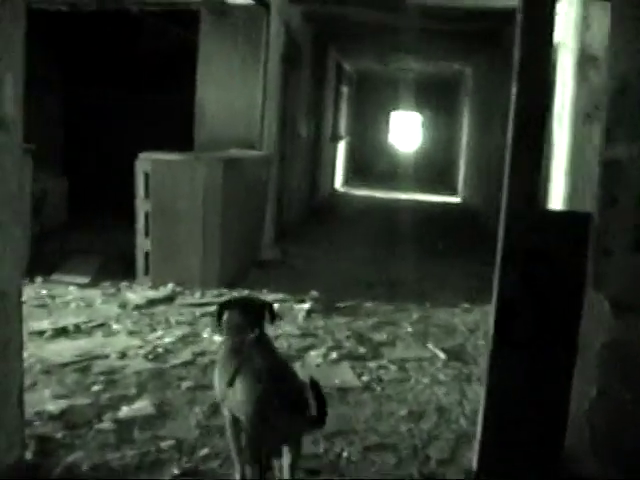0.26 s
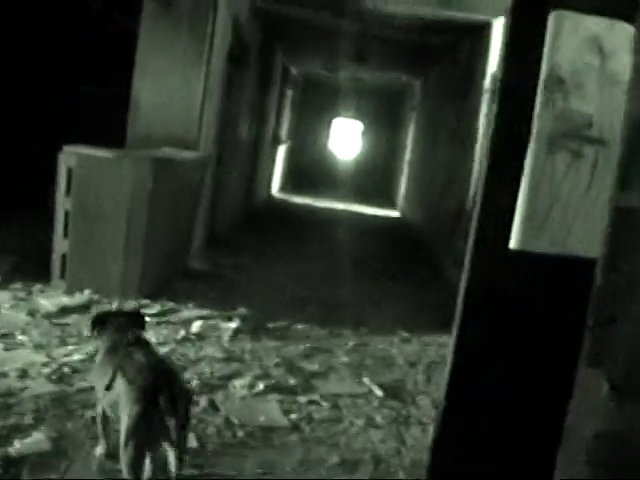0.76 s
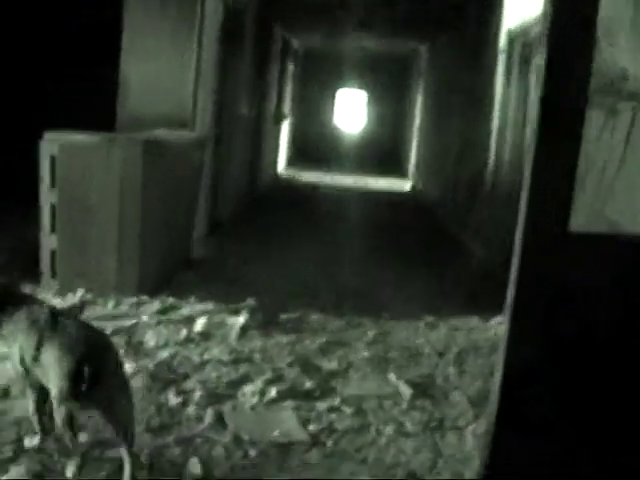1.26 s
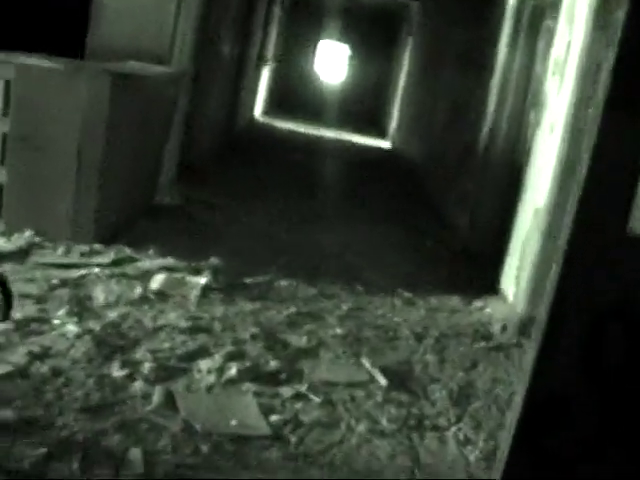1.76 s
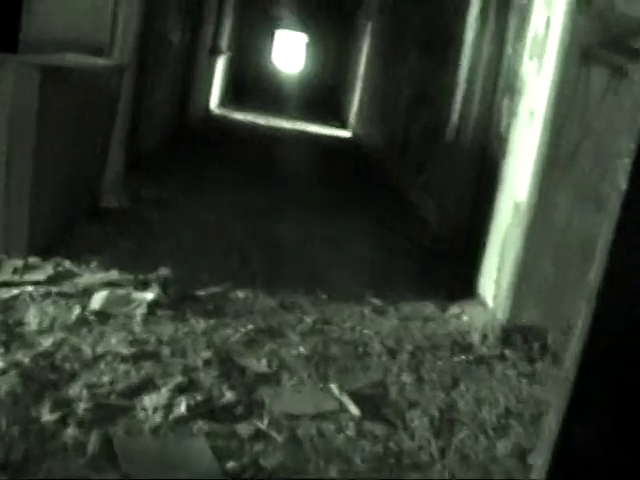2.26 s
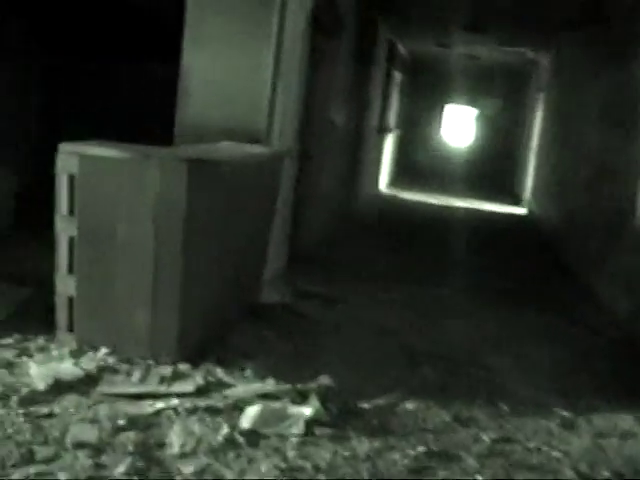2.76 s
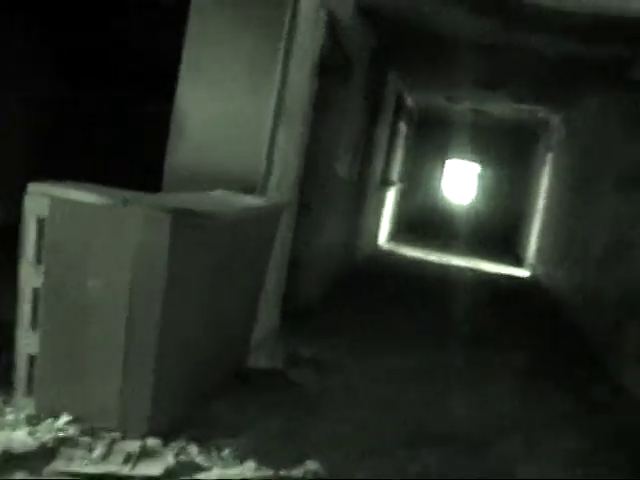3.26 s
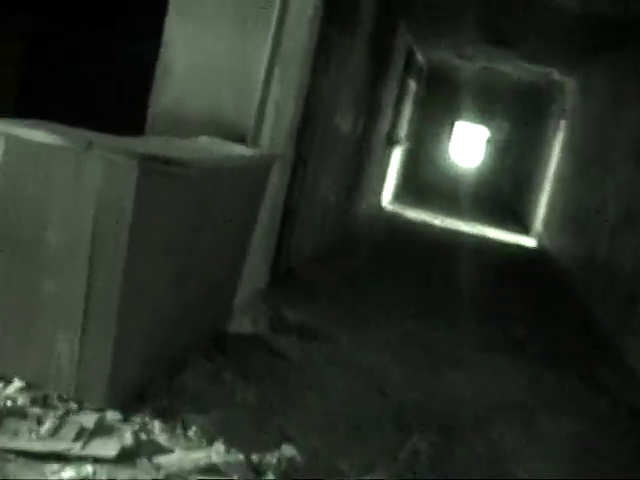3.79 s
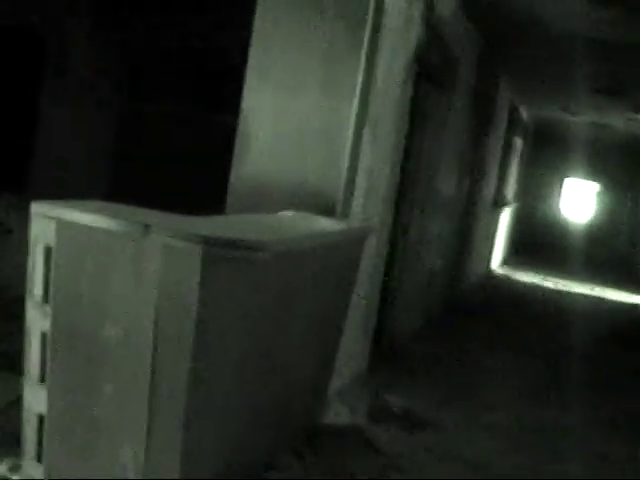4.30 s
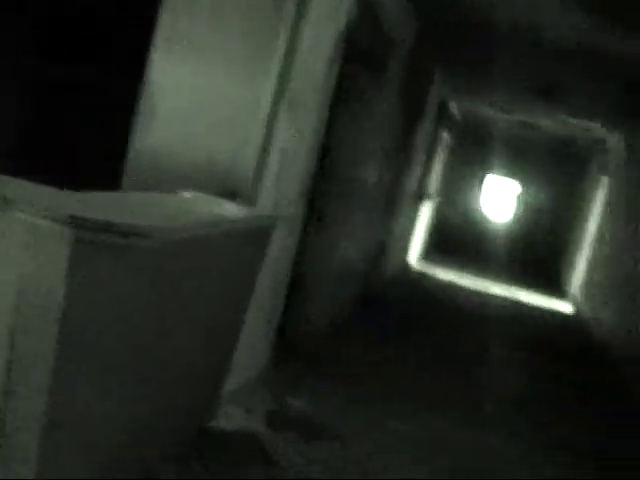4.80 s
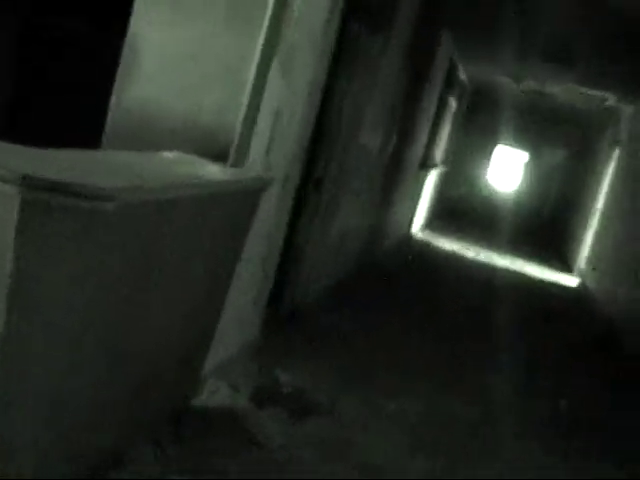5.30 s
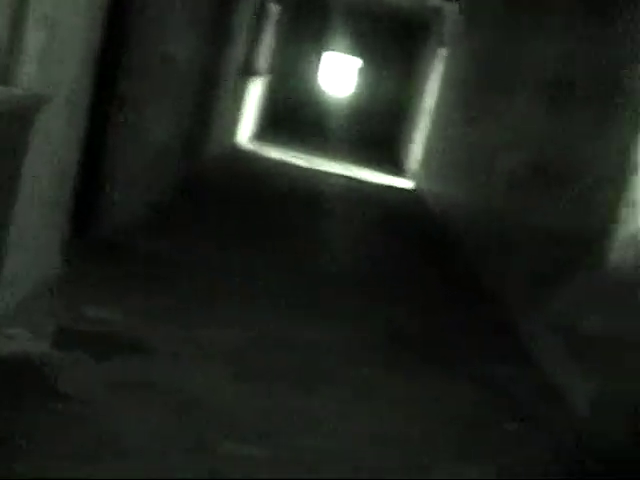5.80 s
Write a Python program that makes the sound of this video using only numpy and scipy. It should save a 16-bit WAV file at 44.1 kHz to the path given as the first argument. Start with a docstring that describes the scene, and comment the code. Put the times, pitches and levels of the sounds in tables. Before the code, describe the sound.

Someone walks over loose debris in a bare derelict corridor: grit crackles, slabs knock hollowly, small metal tinkles, something creaks under weight.

```python
"""Debris cracks, footfalls thud, grit crumbles, slabs knock; small metal pieces, perhaps a dog's collar tags, clink.
A creak comes late, over hiss. Someone walks over broken plaster and rubble in a derelict corridor, camera in hand.
Debris is sparse clicks, smeared and filtered by each piece; metal adds damped partials; the creak is stick-slip.
Side walls return a short flutter, nearby surfaces a scatter of echoes and the bare rooms a tail.
Heel thumps are damped pushes, handling is low filtered noise; the camera adds soft limiting and a thin whine."""
import sys
import numpy as np
from scipy import signal
from scipy.fft import rfft, irfft
from scipy.io import wavfile
from scipy.ndimage import map_coordinates

SR = 44100
rng = np.random.default_rng(int(sys.argv[2]) if len(sys.argv) > 2 else 0)


def wrap_up_sound(samples):
    """Save the sound to the file named by the first command line argument, as 16-bit audio."""
    columns = np.atleast_2d(samples).T
    # keep every value between -1 and 1, then stretch to whole-number steps
    tamed = np.clip(columns, -1, 1)
    steps = np.round(tamed * 32767).astype(np.int16)
    wavfile.write(sys.argv[1], SR, steps)


N = 266805

# Background hiss spectrum. Each row: frequency in Hz, relative density in dB per Hz.
HISS_SPECTRUM = [(24, -35), (40, 1), (156, 0.5), (186, -2.5), (270, -2), (746, -8.5), (1780, -6.5),
                 (2110, -13), (2710, -13), (15000, -21.5)]
HISS_RMS_DB, HISS_SWELL_DB, HISS_SWELL_S = -60.5, 1.1, .12  # mean level, swell scatter, knot spacing

# Handling rumble spectrum. Each row: frequency in Hz, relative density in dB per Hz.
HANDLING_SPECTRUM = [(15, -17), (70, 0.0), (130, 3.0), (250, -21.0), (1000, -39), (8000, -104)]
# The hand bumps the camera. Each row: centre in seconds, peak rms in dB, half length to 1/e in seconds.
HAND_BUMPS = [(3.262, -50, 0.018), (5.77, -49, 0.11), (5.968, -47, 0.072)]
GRIP_RMS_DB = -77  # steady hand

# Loose grains: always, added just after a crunch, added under the weight that makes the creak.
GRIT_RMS_DB, STIRRED_RMS_DB, LOADED_RMS_DB = -68.5, -60, -57.5
SETTLE_S, LOADED_UNTIL_S = 0.048, 5.45

# A piece of debris cracks or a footfall thuds, with one broad resonance.
# Each row: start in seconds, energy in dB before trim, centre in Hz, width in octaves.
CRACKS_AND_THUDS = [(0.0112, -21.5, 4620, 3), (0.028, -19.0, 1330, 0.42), (0.115, -19.5, 12000, 0.91),
                    (0.166, -22, 3420, 0.2), (0.273, -23.5, 3240, 0.23), (0.342, -12, 1680, 1.2),
                    (0.3548, -11, 860, 0.97), (0.4423, -12.5, 12000, 2.3), (0.5491, -18, 1250, 2),
                    (0.613, -22, 12000, 4.1), (0.701, -22.5, 2400, 0.86), (1.0223, -16, 2010, 0.98),
                    (1.031, -17.5, 467, 1.5), (1.0821, -15.5, 1400, 1.1), (1.138, -19.5, 1960, 1.7),
                    (1.1628, -14, 8560, 0.66), (1.22, -5, 2830, 1.04), (1.2688, -14, 12000, 0.99),
                    (1.3068, -20.0, 2600, 0.61), (1.4615, -11, 2140, 0.69), (1.5312, -13.5, 2160, 0.68),
                    (1.713, -18, 209, 0.95), (1.7612, -10.5, 970, 0.93), (1.8876, -20.5, 1180, 0.4),
                    (2.087, -28.5, 4840, 1.7), (2.37, -18.5, 2250, 1.6), (2.389, -13.5, 870, 0.69),
                    (2.567, -18.5, 1620, 0.77), (2.6016, -22, 2300, 2.8), (2.6785, -25, 1310, 1.04),
                    (2.775, -26, 2100, 0.37), (2.883, -22, 3620, 1.1), (2.9619, -23, 2500, 0.66),
                    (3.1, -13.5, 1500, 0.27), (3.139, -8, 1300, 1.4), (3.1546, -14, 3900, 0.42),
                    (3.181, -13.5, 1400, 0.26), (3.216, -12.5, 3510, 0.82), (3.633, -23, 7950, 1.9),
                    (3.7768, -4, 890, 0.43), (3.7864, -4, 4630, 0.83), (3.846, -8, 1770, 2.2),
                    (3.8851, -3.5, 610, 1.54), (3.889, -9, 4000, 1.2), (3.9974, -12, 1610, 1.1),
                    (4.184, -26, 1620, 1.1), (4.5, -20.5, 1550, 0.8), (4.5615, -10.0, 1120, 0.4),
                    (4.6185, -10, 2420, 1.35), (5.3752, -22, 670, 0.49), (5.7174, -15.5, 674, 0.91),
                    (5.8287, -12.5, 520, 1.46)]
# Rubble radiates little deep bass or top treble. Each row: frequency in Hz, gain in dB.
RUBBLE_REACH = [(20, -67), (100, -6.5), (220, -1.5), (7300, -3), (10500, -11), (16000, -23)]
# The walker leaves the open room for the narrow corridor.
# Each row: time in seconds, impact send to the tail in dB before each impact type's offset.
TAIL_SEND = [(0, -10), (3.7, -8), (4.2, -9), (6, -11)]
LEAD_S = .008  # grinding before the click

# Grit crumbles under a foot. Each row: start in seconds, energy in dB, middle ring in Hz, snap in dB,
# length in seconds.
GRIT_CRUNCHES = [(0.083, -22, 2820, 16, 0.028), (0.148, -20, 3380, -11.5, 0.042),
                 (0.256, -15.5, 2150, 7.5, 0.094), (0.358, -9, 2920, 14.5, 0.017),
                 (0.376, -21.5, 1010, -7, 0.089), (0.456, -8, 3600, -13.5, 0.0082),
                 (0.7, -22, 2140, -1, 0.034), (0.863, -8.5, 3940, -9.5, 0.013), (1.024, -19, 540, 8, 0.06),
                 (1.046, -16, 2480, 5, 0.077), (1.114, -17, 2680, -34, 0.09), (1.27, -17, 4170, 19, 0.072),
                 (1.373, -19, 1290, -0.5, 0.053), (1.466, -9.5, 2140, 2, 0.031),
                 (1.696, -18, 855, 7, 0.034), (2.241, -26.5, 4870, -4, 0.023),
                 (3.087, -17, 1540, 1.5, 0.023), (3.122, -14, 1280, 1, 0.029),
                 (3.172, -11.5, 1200, 5, 0.033), (3.264, -6, 1080, 3, 0.057), (3.792, -7, 3330, 9, 0.047),
                 (3.916, -14, 1520, 14, 0.049), (4.005, -22, 6340, 13, 0.057),
                 (4.535, -16.5, 545, 5, 0.017), (4.647, -17, 3730, -15, 0.047), (5.407, -18, 2250, -1, 0.1),
                 (5.618, -24.5, 1920, 12, 0.02), (5.712, -13, 640, -7, 0.066)]
MID_PIECE_HZ, THUD_DB, THUD_DB_PER_OCTAVE = 1340, 7.5, 7  # bigger chips ring lower and thud more
FIZZ_DB, FIZZ_DB_PER_SNAP_DB = -10, 1.8

# Small metal pieces, perhaps a dog's collar tags, touch. Each row: start in seconds, energy in dB,
# main partial in Hz, second partial in Hz, t60 in seconds, chatter decay in seconds.
METAL_CLINKS = [(0.2097, -10.5, 8150, 7160, .04, 0.00039), (0.527, -10, 10400, 5830, 0.039, 0.0031),
                (1.4235, -10, 10100, 11200, 0.055, 0.0014), (2.205, -25.5, 4930, 7460, .06, 0.0071),
                (2.251, -25.5, 6200, 4400, .12, 0.0063), (2.271, -19.5, 4470, 5900, 0.047, 0.0044),
                (2.301, -21, 7860, 5040, 0.067, 0.0015), (3.407, -20, 8320, 6900, .08, 0.0074),
                (3.928, -15, 6890, 8100, 0.13, 0.008), (4.011, -13.5, 6950, 8140, 0.13, 0.017),
                (4.087, -19.5, 7040, 10330, .25, 0.029), (4.218, -23, 8050, 7170, .2, 0.017),
                (4.564, -16, 5400, 8640, 0.15, 0.0077), (5.593, -20, 8570, 5400, 0.087, 0.0079)]
# Weaker modes of the metal, before scatter. Each entry: frequency in Hz.
METAL_MODES_HZ = [4350, 4860, 5400, 6300, 6920, 8200, 8900, 10900, 11020, 12700, 14030]
CLINK_REACH_LN, CLINK_DETUNE_SHARE = .7, .012  # width of the struck group (log frequency), pitch scatter

# A slab tips and knocks. Each row: start in seconds, energy in dB before trim, body in Hz, body in dB,
# main ring in Hz, upper ring in Hz, upper ring in dB, snap in dB; the parts are relative to the main ring.
SLAB_KNOCKS = [(0.872, -6.5, 1110, 1.5, 1830, 4450, -1, -16), (1.2155, -7, 730, -12, 1300, 3410, -9, -23.5),
               (3.2583, 7.5, 413, -8.5, 1160, 1980, -10.5, -16.5),
               (3.348, -4.5, 514, 0.5, 1510, 2200, -0.5, -16.5),
               (3.768, 4.5, 1000, -0.5, 1550, 1920, -1.5, -3.5),
               (3.8799, 5.5, 374, -3, 780, 1880, -3.5, -8.5), (3.9565, -0.5, 480, -1.5, 1820, 2570, 6.5, 3),
               (4.2467, 4, 370, -6, 1290, 2600, -9, -17.5), (4.306, -1, 477, -7, 1590, 1960, -3.5, -26.5),
               (5.4162, -7, 720, -22, 716, 1290, -6, -24), (5.739, -9.5, 300, -7, 587, 1700, -21, -47),
               (5.769, 2, 463, -6.5, 820, 1040, 1, -25)]

# A heel lands and the floor thumps. Each row: start in seconds, envelope peak in dB.
HEEL_THUMPS = [(3.259, -25.5), (3.881, -37.5)]
THUMP_S = .0014  # time constant of the push

# Creak speed. Each row: time in seconds, slips per second.
CREAK_SLIP_RATE = [(4.7245, 27), (4.8, 49), (5., 87), (5.08, 97), (5.21, 40), (5.345, 28)]
# Body the slips shake, before scatter. Each row: frequency in Hz, relative density in dB per Hz.
CREAK_BODY_SPECTRUM = [(90, -26), (200, -21), (300, -0.5), (440, -2.5), (630, -7), (800, 6), (1100, 4),
                       (1700, 7), (2550, 1), (3700, 7.5), (4600, 2), (5400, -5.5), (8500, -7.5),
                       (11500, -16), (15000, -43)]
# Weight on the creak. Each row: time in seconds, added slip force in dB.
CREAK_WEIGHT = [(4.75, 0), (4.8, 0), (4.92, 1.5), (4.96, -1), (4.985, -1), (4.997, 1), (5.028, -2),
                (5.045, -3), (5.062, -0.5), (5.1, 2.5), (5.12, -3.5)]
SLIP_DB, SLIP_AT_PER_S, SLIP_DB_PER_OCTAVE = -9, 82, 5  # faster slips hit harder
EASE_S, EASE_DB = 5.118, -3.5  # the weight comes off and the slips turn soft
SLIP_WANDER_DB, SLIP_JITTER_S = 1.3, .0003  # each slip catches at another spot

WALLS_S = .00756  # round trip between the side walls
# Tail of the rooms. Each row: frequency in Hz, t60 in seconds.
ROOM_T60 = [(150, 0.96), (500, 0.34), (1200, 0.41), (3000, 0.37), (7000, 0.38), (14000, 0.38)]

# Left-right likeness of diffuse sound. Each row: frequency in Hz, correlation.
PORT_LIKENESS = [(40, 0.54), (150, 1), (400, 0.75), (1200, 0.77), (3000, 0.63), (6000, 0.37), (14000, 0.94)]
# Phase between the ports. Each row: frequency in Hz, left lead in radians.
PORT_LEAD = [(10, 0.52), (3000, 0.42), (6000, 0.88), (7500, 0.98), (9500, 2.07), (11000, 2.05),
             (12500, 1.4), (15000, 2.8)]
EDGE_HZ = 16250  # upper band limit


def amp(db):
    """Decibels to gain."""
    return 10 ** (np.asarray(db) / 20)


def unit(x):
    """Scales to energy 1."""
    return x / np.sqrt(np.sum(x ** 2) + 1e-20)


def read(points, hz):
    """Reads a table of (Hz, value) on a log-frequency axis."""
    f, value = np.transpose(points)
    return np.interp(np.log(hz + 1), np.log(f + 1), value)


def add(mix, start_s, sound):
    """Mixes a sound in from start_s."""
    part = mix[max(0, round(start_s * SR)):][:len(sound)]
    part += sound[:len(part)]


def colour(x, shape, size=2048):
    """Causal minimum-phase filter whose gain in dB is shape(Hz)."""
    log_gain = np.log(amp(shape(abs(np.fft.fftfreq(size, 1 / SR)))))
    taps = np.fft.ifft(np.exp(np.conj(signal.hilbert(log_gain)))).real
    return signal.oaconvolve(x, taps[:size // 2])


def hump(f, hz, octaves):
    """Power of one broad resonance."""
    return (1 + (np.log2((f + 1) / hz) / octaves) ** 2) ** -2.


def diffuse(a, b):
    """Two unrelated signals become the partly alike pair that two close ports hear."""
    same = np.clip(read(PORT_LIKENESS, np.fft.rfftfreq(N, 1 / SR)), 0, 1)
    mid = rfft(a[:N]) * np.sqrt((1 + same) / 2)
    side = rfft(b[:N]) * np.sqrt((1 - same) / 2)
    return irfft([mid + side, mid - side], N)


def noise(spectrum):
    """Diffuse filtered noise of about rms 1."""
    white = rng.standard_normal((2, N))
    coloured = [unit(colour(w, lambda f: read(spectrum, f))) for w in white]
    return diffuse(*coloured) * np.sqrt(N)


def grains(count, per_s, spread_db):
    """Sparse clicks of either sign, a few much larger than the rest."""
    size = amp(spread_db * np.minimum(rng.exponential(1, count), 3.5))
    return size * rng.choice([-1, 1], count) * (rng.random(count) < per_s / SR)


def smear(x, longest_s=.0009, count=3):
    """A click rattles through a solid piece: all-pass loops spread it and keep its spectrum."""
    for delay in (SR * longest_s * rng.uniform(.15, 1, count)).astype(int):
        loop = np.r_[1, np.zeros(delay), .55 * rng.choice([-1, 1])]
        x = signal.lfilter(loop[::-1], loop, x)
    return x


def shard(drive, hz, thud_db, snap_db, fizz_db, ring_db):
    """Rubble answers a force with a broad spectrum and one quickly damped ring."""
    body = [(20, thud_db - 28), (90, thud_db - 14), (190, thud_db - 6), (400, thud_db * .4),
            (800, 0), (1500, -1), (2600, snap_db / 2 - 1), (4800, snap_db),
            (7300, (snap_db + fizz_db) / 2 + 3), (10500, fizz_db), (16000, fizz_db - 12)]

    def gain_db(f):
        return read(body, f) + ring_db / (1 + (np.log((f + 1) / hz) / 0.28) ** 2)

    return unit(colour(drive, gain_db))


def hiss():
    """Diffuse background noise whose level rises and sinks a little."""
    knots_s = np.arange(0, N / SR + HISS_SWELL_S, HISS_SWELL_S)
    swell_db = HISS_SWELL_DB * np.interp(np.arange(N) / SR, knots_s, rng.standard_normal(len(knots_s)))
    return amp(HISS_RMS_DB + swell_db) * noise(HISS_SPECTRUM)


def grip():
    """Strength of the handling rumble: a steady hand and a few soft bumps."""
    t = np.arange(N) / SR
    bumps = sum(amp(db) * np.exp(-((t - s) / half_s) ** 2) for s, db, half_s in HAND_BUMPS)
    return amp(GRIP_RMS_DB) + bumps


def handling():
    """The shaking body pushes the two capsules in opposite senses."""
    return grip() * noise(HANDLING_SPECTRUM) * np.array([[1], [-1]])


def grit(near, far, room_db=-2, ring_db=20):
    """Loose grains tick, each size at its own pitch; crunches stir them, and they grind under the weight."""
    ticks = sum(shard(smear(grains(N, 45, 4)), hz, -4, -5, -14, ring_db)[:N]
                for hz in np.geomspace(500, 6000, num=9))
    t = np.arange(N) / SR
    stirred = np.max([(t > s) * np.exp(-abs(t - s) / SETTLE_S) for s, *_ in GRIT_CRUNCHES], axis=0)
    loaded = (t > CREAK_SLIP_RATE[0][0]) & (t < LOADED_UNTIL_S)
    level = amp(GRIT_RMS_DB) + amp(STIRRED_RMS_DB) * stirred + amp(LOADED_RMS_DB) * loaded
    sound = unit(ticks) * np.sqrt(N) * level
    add(near, 0, sound)
    add(far, 0, amp(room_db) * sound)


def impact(near, far, s, db, power, lead_db, crumbs_db, crumbs_s, room_db):
    """A brief grind, then one click and a spray of crumbs, all coloured by the body that is hit."""
    t = np.arange(SR // 16) / SR
    rise = np.linspace(0, 1, round(LEAD_S * SR))
    lead = amp(lead_db) * unit(rng.standard_normal(len(rise)) * rise ** 2)
    drive = amp(crumbs_db) * unit(grains(len(t), 4000, 5.5) * np.exp(-t / crumbs_s))
    drive[0] += 1  # the click

    def gain_db(f):
        return read(RUBBLE_REACH, f) + 10 * np.log10(power(f) + 1e-7)

    sound = amp(db) * unit(colour(smear(np.r_[lead, drive]), gain_db))
    send_db = room_db + np.interp(s, *np.transpose(TAIL_SEND))
    add(near, s - LEAD_S, sound)
    add(far, s - LEAD_S, amp(send_db) * sound)


def cracks_and_thuds(near, far, trim_db=-1):
    """A piece of debris cracks or a footfall thuds, each with one broad resonance."""
    for s, db, hz, octaves in CRACKS_AND_THUDS:
        impact(near, far, s, db + trim_db, lambda f: hump(f, hz, octaves),
               lead_db=-10.5, crumbs_db=-8, crumbs_s=.006, room_db=3)


def fizz_of(snap_db):
    """The sharper a piece breaks, the more top treble it gives, in dB over its mids."""
    return FIZZ_DB + FIZZ_DB_PER_SNAP_DB * snap_db


def crunches(near, far, room_db=-6, count=7):
    """Chips of several sizes fracture, each at its own pitch; the cloud swells and dies with the pressure."""
    t = np.arange(SR // 5) / SR
    for s, db, hz, snap_db, length_s in GRIT_CRUNCHES:
        pressure = (t / length_s) ** 0.55 * np.exp(-3.6 * (t / length_s) ** 7.8)
        thud_db = THUD_DB - THUD_DB_PER_OCTAVE * np.log2(hz / MID_PIECE_HZ)
        chips = []
        for pitch_hz in hz * np.geomspace(.55, 1.9, num=count):
            drive = smear(grains(len(t), 240, 5.3) * pressure)
            chips.append(shard(drive, pitch_hz, thud_db, snap_db, fizz_of(snap_db), ring_db=22))
        sound = amp(db) * unit(sum(chips))
        add(near, s, sound)
        add(far, s, amp(room_db) * sound)


def clinks(near, far, contact_db=15, contact_s=0.0012, chatter_db=2, room_db=-11,
           second_db=-2, others_db=-11, tick_db=-4):
    """Metal chatters at the touch and rings in two strong partials and the weaker modes around them."""
    t = np.arange(SR // 4) / SR
    for s, db, main_hz, second_hz, t60_s, chatter_s in METAL_CLINKS:
        scatter = rng.standard_normal(len(METAL_MODES_HZ))
        others_hz = np.array(METAL_MODES_HZ) * (1 + CLINK_DETUNE_SHARE * scatter)
        hz = np.r_[main_hz, second_hz, others_hz][:, None]
        others = amp(others_db) * np.exp(-(np.log(others_hz / main_hz) / CLINK_REACH_LN) ** 2)
        weight = np.r_[1, amp(second_db), others][:, None]
        partials = np.sin(2 * np.pi * (hz * t + rng.random(hz.shape)))
        ring = (weight * amp(-60 * t / t60_s) * partials).sum(0)
        touches = amp(chatter_db) * unit(grains(len(t), 1500, 2.5) * np.exp(-t / chatter_s))
        touches[0] += 1
        contact = 1 + amp(contact_db) * np.exp(-t / contact_s)
        ringing = signal.fftconvolve(touches, ring * contact)[:len(t)]
        tick = colour(smear(touches), lambda f: 10 * np.log10(hump(f, main_hz, 0.56) + 1e-7))[:len(t)]
        sound = amp(db) * unit(unit(ringing) + amp(tick_db) * unit(tick))
        add(near, s, sound)
        add(far, s, amp(room_db) * sound)


def knocks(near, far, trim_db=-1, low_octaves=0.75, ring_octaves=0.34):
    """A slab tips underfoot and hits the floor: a hollow low body, two rings and the snap of its edge."""
    for s, db, low_hz, low_db, main_hz, upper_hz, upper_db, snap_db in SLAB_KNOCKS:
        parts = [(low_hz, low_octaves, low_db), (main_hz, ring_octaves, 0),
                 (upper_hz, ring_octaves, upper_db), (4500, 1.4, snap_db)]

        def power(f):
            return sum(amp(part_db) ** 2 * hump(f, hz, octaves) for hz, octaves, part_db in parts)

        impact(near, far, s, db + trim_db, power, lead_db=-33, crumbs_db=-8.5, crumbs_s=0.0042, room_db=2.5)


def thumps():
    """A heel gives the floor one low, quickly damped push."""
    out = np.zeros(N)
    u = np.arange(SR // 20) / SR / THUMP_S
    for s, db in HEEL_THUMPS:
        add(out, s, amp(db) * np.e * u * np.exp(-u) * np.cos(u))
    return out


def creak(near, far, rub_db=6, rub_s=0.0041, room_db=-8):
    """Stick and slip: slips speed up, then slow; each shakes one body with its own force and colour."""
    at_s = np.arange(CREAK_SLIP_RATE[0][0], CREAK_SLIP_RATE[-1][0], 1 / SR)
    rate = np.interp(at_s, *np.transpose(CREAK_SLIP_RATE))
    slips = np.diff(np.floor(np.cumsum(rate) / SR), prepend=-1) > 0
    load_db = np.interp(at_s, *np.transpose(CREAK_WEIGHT)) + (at_s > EASE_S) * EASE_DB
    force_db = SLIP_DB + SLIP_DB_PER_OCTAVE * np.log2(rate / SLIP_AT_PER_S) + load_db
    t = np.arange(SR // 40) / SR
    body_hz, body_db = np.transpose(CREAK_BODY_SPECTRUM)
    for s, slip_db in zip(at_s[slips], force_db[slips]):
        body = np.c_[body_hz, body_db + SLIP_WANDER_DB * rng.standard_normal(len(body_hz))]
        drive = amp(rub_db) * unit(grains(len(t), 12000, 2) * np.exp(-t / rub_s))
        drive[0] += 1
        level = amp(slip_db + rng.standard_normal())
        sound = level * unit(colour(smear(drive), lambda f: read(body, f)))
        start_s = s + SLIP_JITTER_S * rng.standard_normal()
        add(near, start_s, sound)
        add(far, start_s, amp(room_db) * sound)


def walls(x, first_db, count=6):
    """Sound bounces between the side walls and returns duller, at even intervals."""
    taps, bounce = np.zeros(SR // 10), .7
    for k in range(count):
        taps[round((k + 1) * WALLS_S * SR)] = amp(first_db) * bounce ** k
    dull = signal.firwin(9, 4500, fs=SR)
    return x + signal.oaconvolve(x, np.convolve(taps, dull, "same"))[:N]


def bearing(x, spread_s=.00002, change_s=.03):
    """Sounds come from several directions, so a wandering lag sets one port a little before the other."""
    n = np.arange(N)
    knots = np.arange(0, N + SR, change_s * SR)
    half_lag = np.interp(n, knots, rng.standard_normal(len(knots))) * spread_s * SR / 2  # samples
    return np.array([map_coordinates(x, [n + side * half_lag], order=3) for side in (1, -1)])


def nearby(x, level_db=-10, start_s=0.0026, fade_s=0.019):
    """The floor and the door frame send back a quick scatter of echoes."""
    t = np.arange(SR // 30) / SR
    taps = [unit(grains(len(t), 2100, 7.9) * np.exp(-t / fade_s) * (t > start_s)) for _ in range(2)]
    return amp(level_db) * diffuse(*[signal.oaconvolve(x, side) for side in taps])


def room(x, build_s=0.0012, count=3):
    """Scattered echoes form a tail; each band dies at its own speed; the pattern shifts as the walker moves."""
    taps = np.array([grains(SR * 2 // 3, 3500, 2.5) for _ in range(2 * count)])
    hz, t, bands = signal.stft(taps, SR, nperseg=256)
    decay = amp(-60 * t / read(ROOM_T60, hz)[:, None])
    tails = signal.istft(bands * decay, SR, nperseg=256)[1]
    tails = tails * (1 - np.exp(-np.arange(tails.shape[1]) / SR / build_s))
    turn = np.arange(N) / SR / 1.5 + np.arange(count)[:, None] / count  # half turns
    place = np.cos(np.pi * turn) * np.sqrt(2 / count)
    ports = [sum(signal.oaconvolve(x * share, unit(tail)) for share, tail in zip(place, side))
             for side in np.split(tails, 2)]
    return diffuse(*ports)


def corridor(*sources):
    """Sounds reach the camera directly and through the building."""
    near, far = np.zeros((2, N))
    for source in sources:
        source(near, far)
    direct = bearing(walls(near, first_db=-16.5))
    return direct + nearby(near) + room(walls(far, first_db=-18))


def scene(creak_left_db=1.74):
    """Steps on debris, metal clinks, the creak a little to the left, heel thumps, handling and hiss."""
    steps_and_clinks = corridor(grit, cracks_and_thuds, crunches, clinks, knocks)
    creaking = corridor(creak) * amp([[creak_left_db], [-creak_left_db]])
    return steps_and_clinks + creaking + thumps() + handling() + hiss()


def record(dry, whine_hz=15734, whine_db=-83):
    """The ports differ in phase; the camera rounds off the peaks and adds its thin whine and band limit."""
    lead = read(PORT_LEAD, np.fft.rfftfreq(N, 1 / SR))
    pair = irfft(rfft(dry) * np.exp(1j * np.outer([.5, -.5], lead)), N)
    pair = pair / (1 + (pair / .28) ** 4) ** .25  # peaks stay below .28
    whine = amp(whine_db) * np.sin(2 * np.pi * whine_hz * np.arange(N) / SR)
    band_limit = signal.firwin(401, EDGE_HZ, window=("kaiser", 8), fs=SR)
    return signal.oaconvolve(pair + whine, band_limit[None], "same")


dry = scene()
out = record(dry)
wrap_up_sound(out)
```